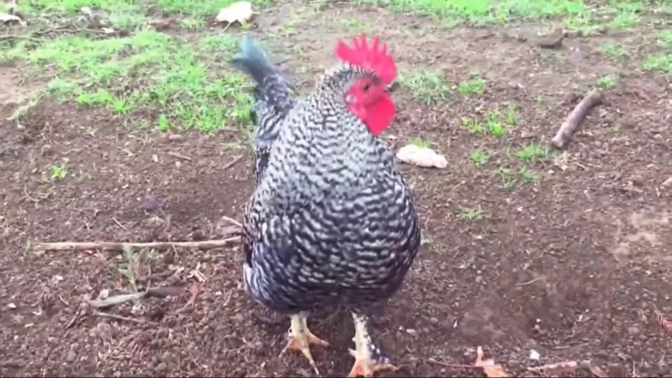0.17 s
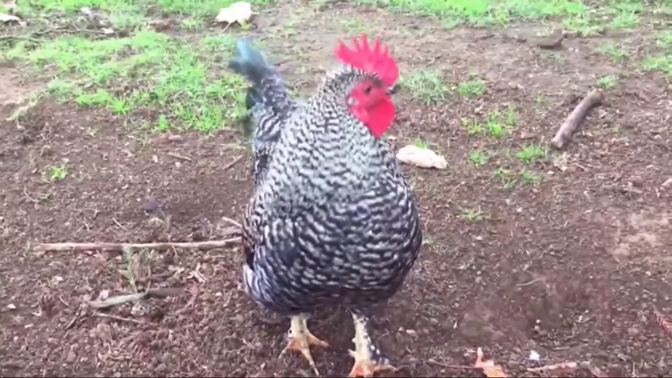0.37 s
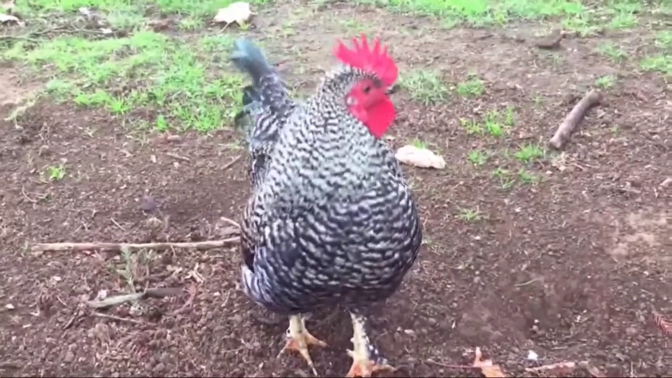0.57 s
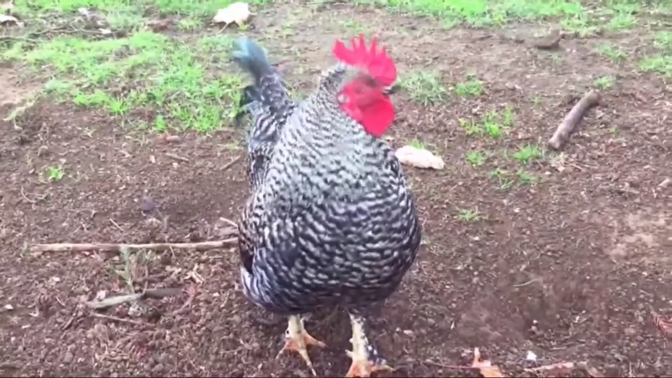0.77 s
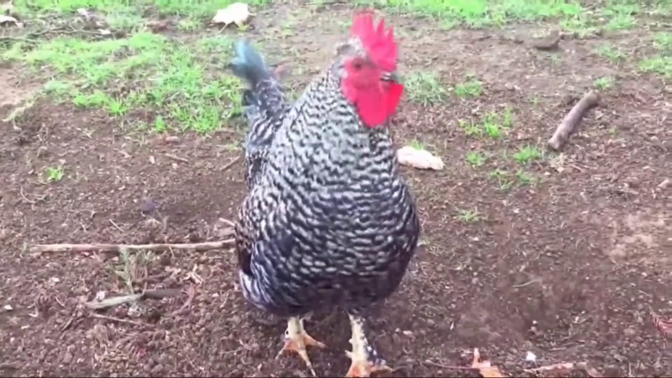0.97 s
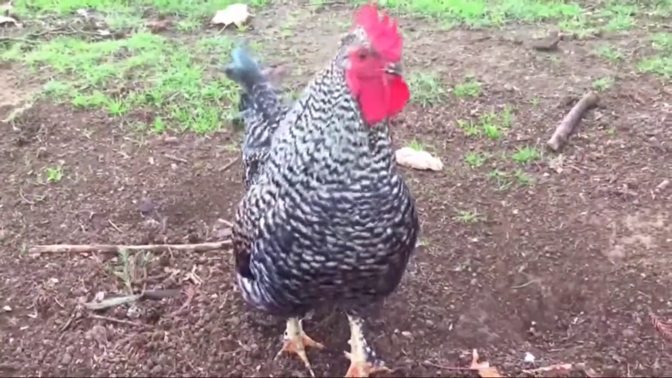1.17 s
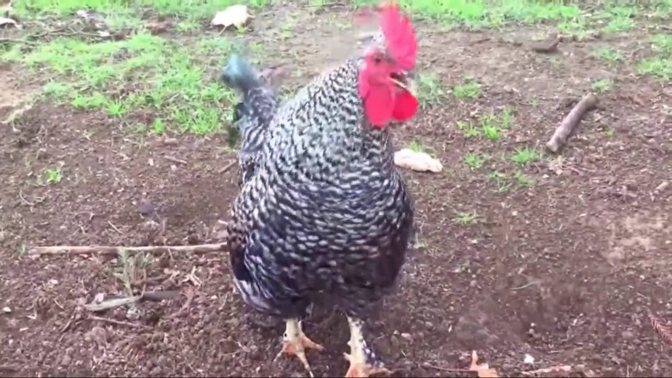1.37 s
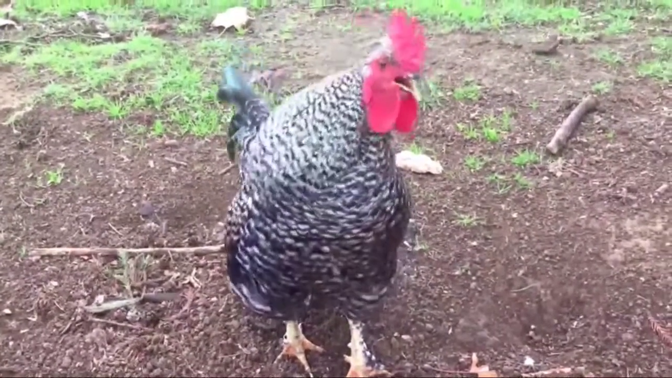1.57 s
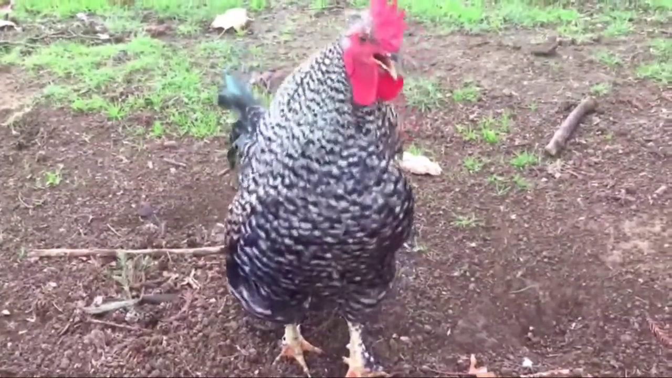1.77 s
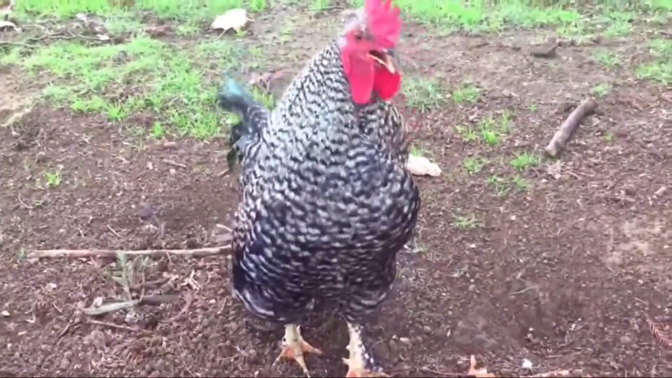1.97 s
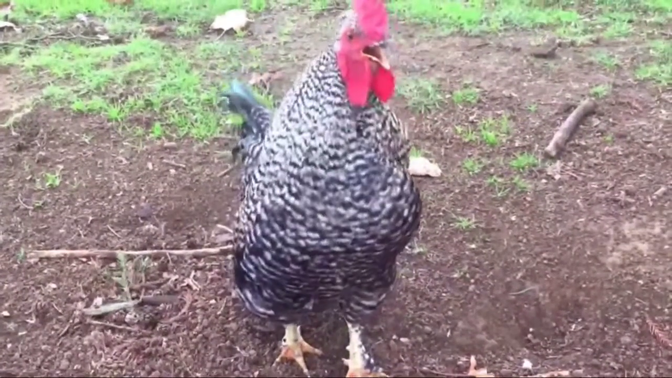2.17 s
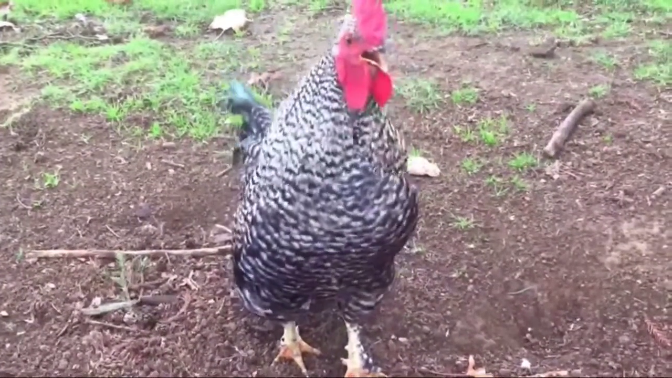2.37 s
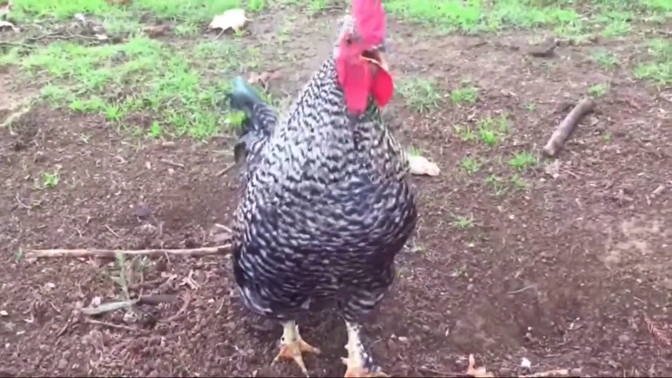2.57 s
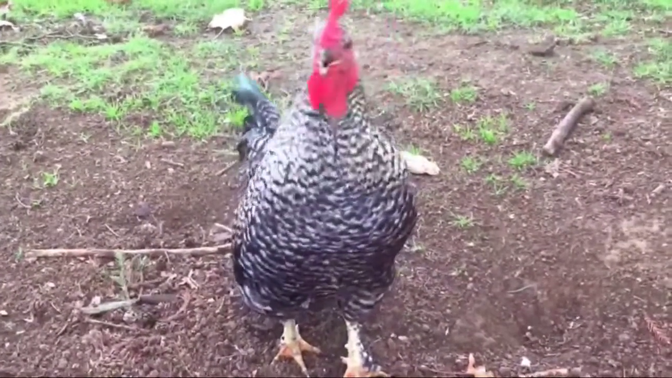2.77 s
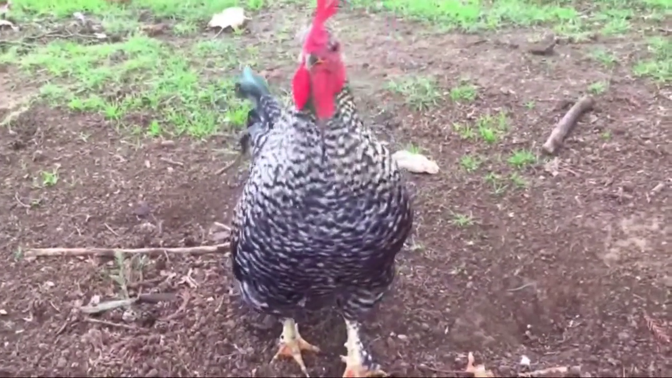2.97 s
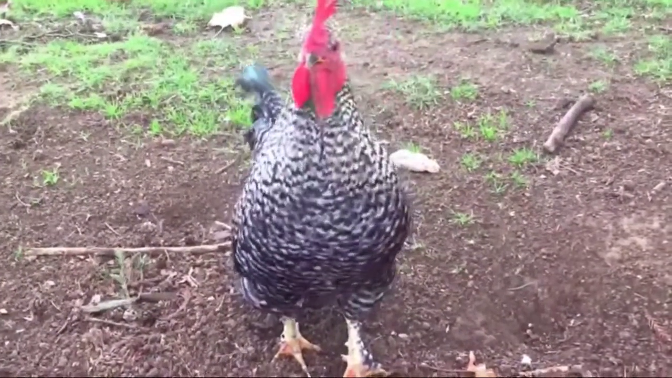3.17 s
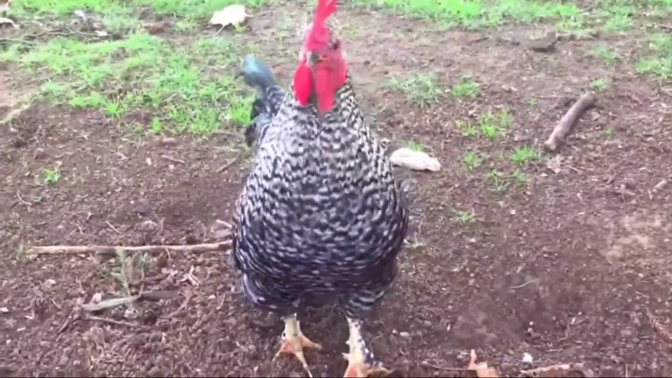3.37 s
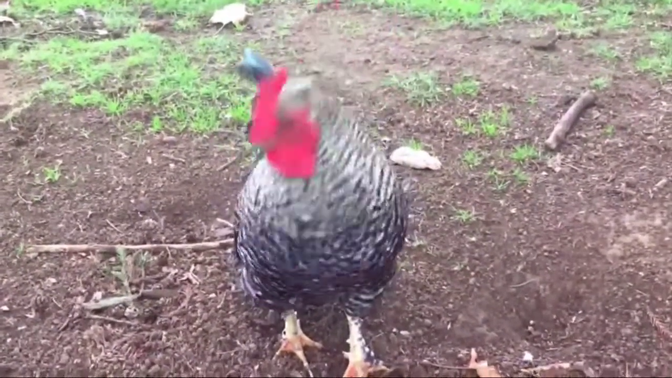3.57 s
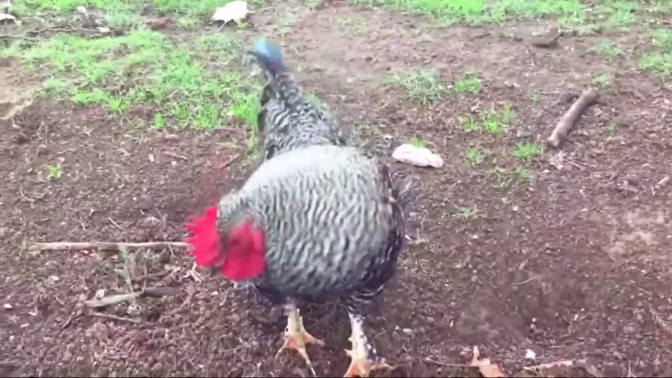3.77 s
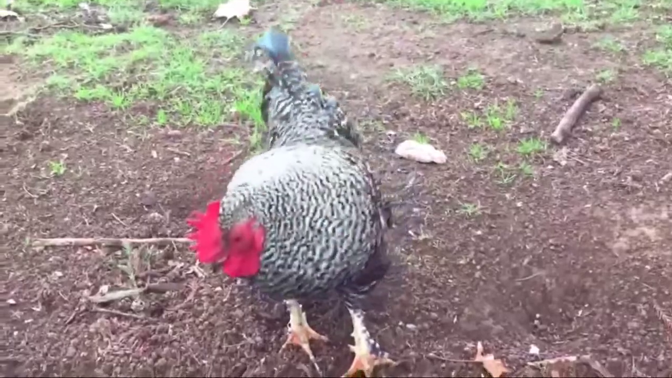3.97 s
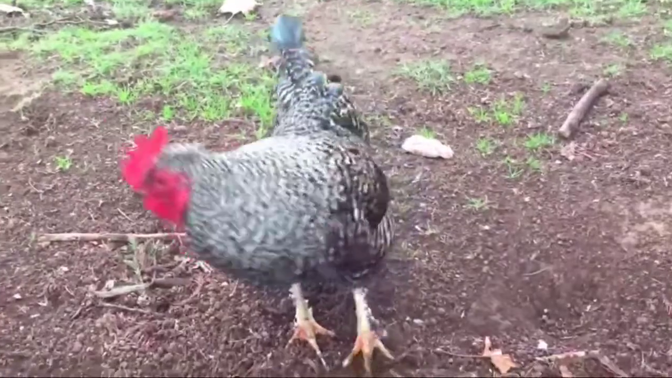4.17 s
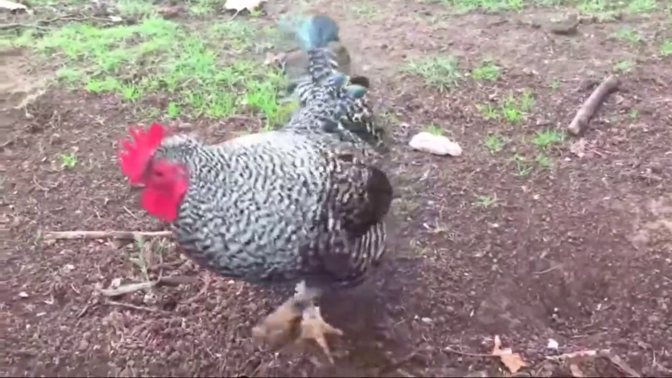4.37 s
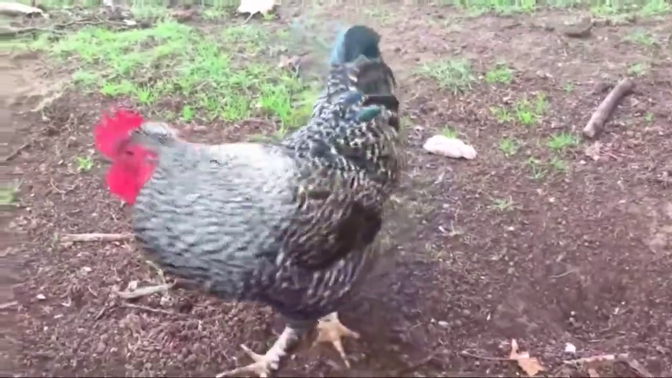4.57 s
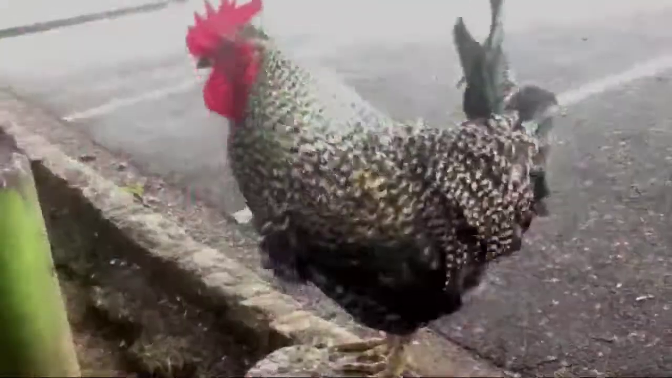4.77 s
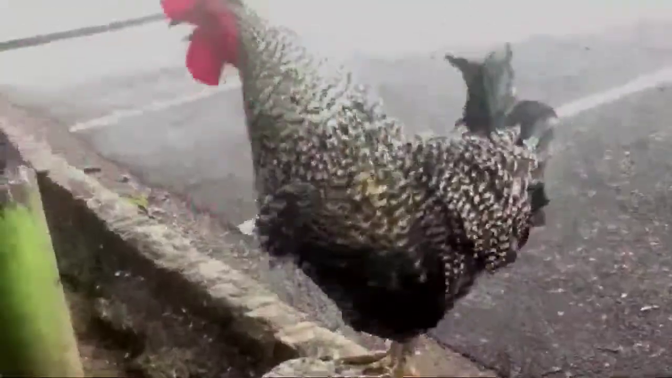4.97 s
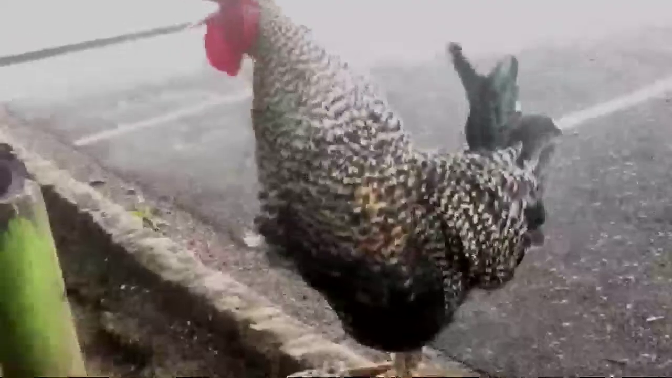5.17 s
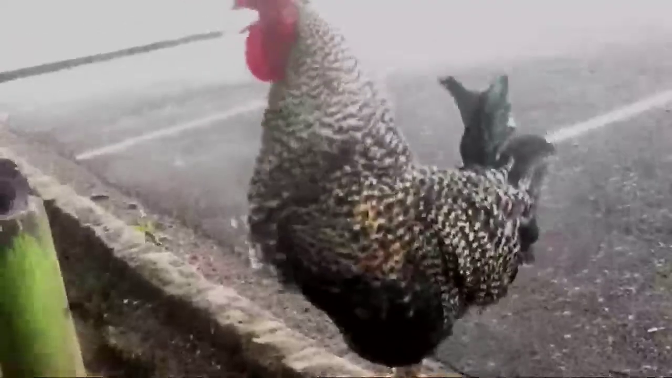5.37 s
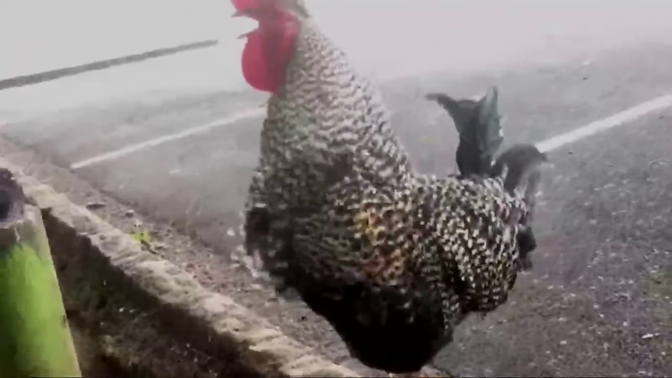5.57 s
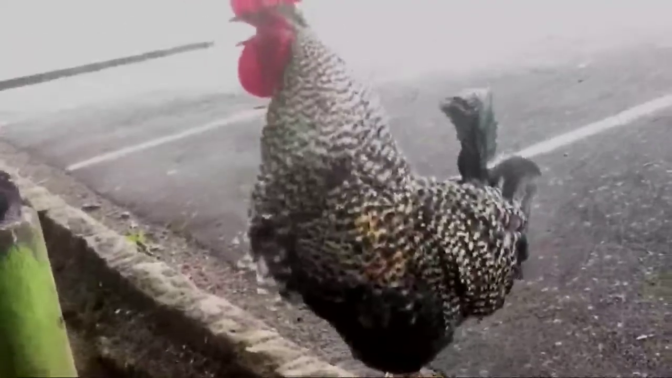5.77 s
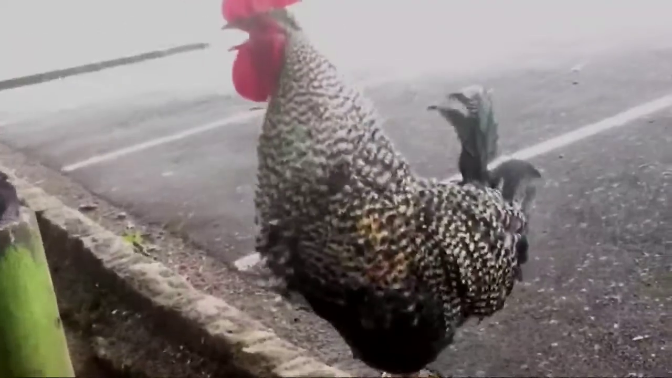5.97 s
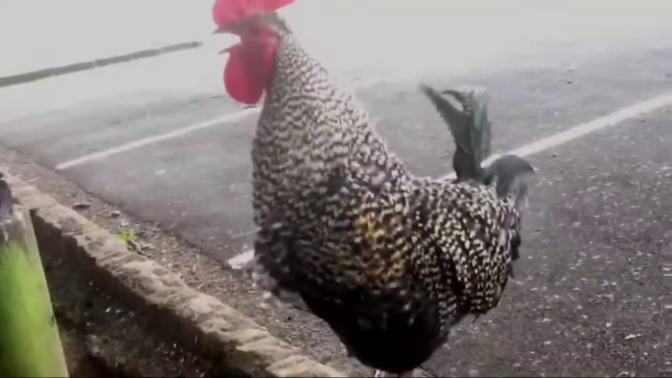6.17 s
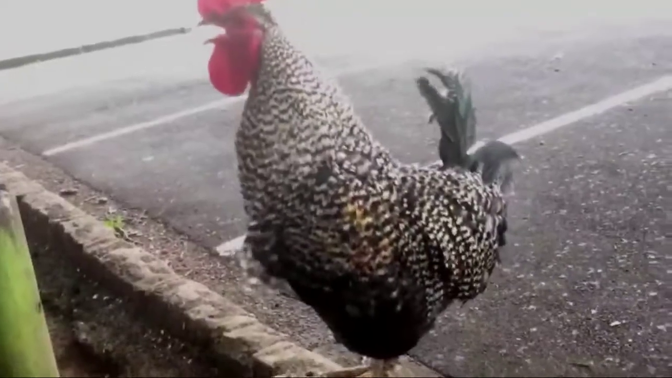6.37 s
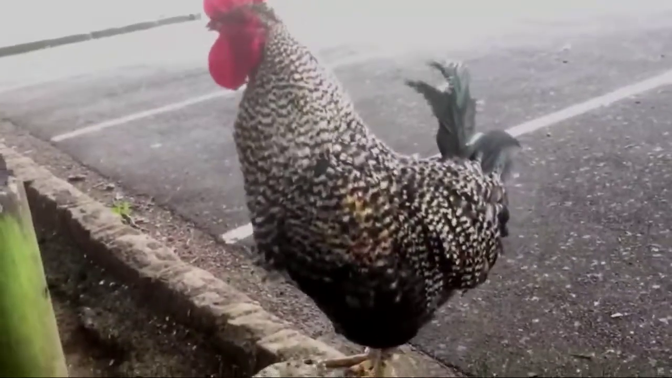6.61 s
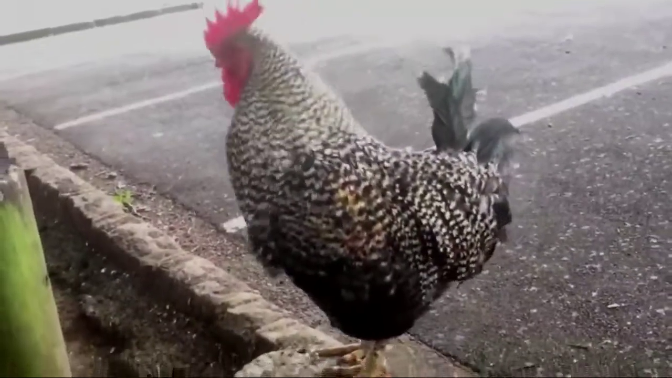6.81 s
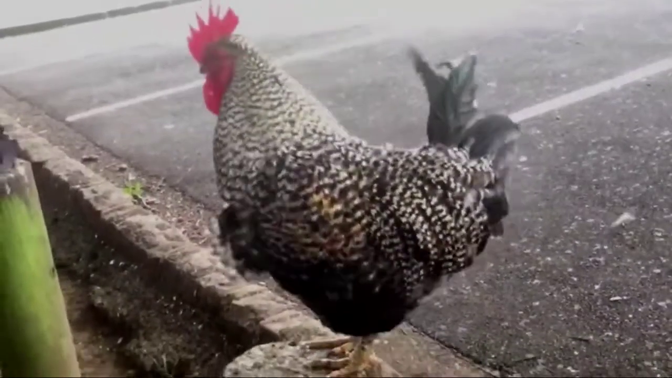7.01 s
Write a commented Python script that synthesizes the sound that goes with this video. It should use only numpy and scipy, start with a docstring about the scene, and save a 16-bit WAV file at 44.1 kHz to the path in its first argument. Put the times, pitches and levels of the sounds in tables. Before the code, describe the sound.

A rooster crows loudly outdoors, a weaker second rooster overlapping its tail; after a quiet pause, one more loud crow rings out over a low rumble.

```python
"""Roosters crow outdoors, louder on the left, over a quiet low rumble with soft rustles.
In the first crow a second, weaker rooster overlaps the leader and finishes after it; one more loud crow
follows. Leader and last crow jump between a clear high and a hoarse low register; all end in a lower rattle.
Each voice is a stack of harmonics shaped by throat resonances, with random modulation for hoarseness.
The rumble and rustles are filtered noise; a small bird's brief chirp is one swept sine."""
import sys
import numpy as np
from scipy import signal
from scipy.io import wavfile
from scipy.ndimage import uniform_filter1d, map_coordinates

SR = 44100
rng = np.random.default_rng(int(sys.argv[2]) if len(sys.argv) > 2 else 0)


def output_pcm(signal):
    """Save a mono or channel-first signal as 16-bit PCM at the path in sys.argv[1].

    Samples are clipped to [-1, 1] before scaling.
    """
    pcm = np.clip(np.atleast_2d(signal).T, -1, 1) * 32767
    wavfile.write(sys.argv[1], SR, np.round(pcm).astype(np.int16))


N = 310489
TIME = np.arange(N) / SR
CUTOFF_HZ = 15500

# Pitch of the leader's broken second syllable. Each row: time in seconds, pitch in Hz.
WARBLE_PITCH = [(1.662, 730), (1.679, 790), (1.693, 685), (1.709, 800), (1.722, 760), (1.735, 788),
                (1.755, 758)]
# The long held note of each crow. Each row: time in seconds, pitch in Hz, level in dB,
# fundamental emphasis in dB, upper-formant emphasis in dB.
LEADER_HELD = [(2.185, 904.5, -22.5, -3, 2.5), (2.25, 927, -21.5, -1, 4), (2.347, 937.2, -19.5, -3, 1),
               (2.429, 932.3, -21.5, -3.5, 2.5), (2.491, 876, -25, 3.5, 2), (2.6, 834.4, -29.5, 11, 4.5),
               (2.635, 770, -37, 10, -4.5), (2.735, 722, -38, 9, -5)]
ANSWER_HELD = [(2.655, 816, -43, -7, -10), (2.735, 872, -32, -10.5, -11.5), (2.901, 879, -31, -10, -11.5),
               (2.991, 874, -31, -11, -11.5), (3.11, 824, -39.5, -12.5, -15), (3.195, 756, -43.5, -9, 5.5),
               (3.23, 720, -45.5, -7, -6)]
LAST_HELD = [(5.71, 908, -21.5, -7, -5), (5.785, 924, -17.5, -11, -8.5), (5.946, 923.5, -18.5, -10, -6.5),
             (6.038, 912.5, -21.5, -9.5, -5.5), (6.098, 886.7, -21.5, -11, -9),
             (6.27, 859, -20.5, -18.5, -9), (6.36, 832, -25.5, -4, 3), (6.42, 817, -26, -1.5, 10.5),
             (6.49, 775.5, -33, 4.5, 0), (6.505, 722, -37, 5, -3)]

ATTACK_S, RELEASE_S, EDGE_DB = .012, .018, 30.5  # a note rises and falls by so many dB in these times
ONSET_ROUGH, SETTLE_S = .13, .018  # a clear note starts rough and settles
FLUTTER_HZ, FLUTTER_DEPTH = 39.2, .0074  # rate, and share of the pitch, of a held note's flutter
CROAK_BRASS_DB, CROAK_RING_DB = -5, 2.5  # hoarse notes are hardly brassy but ring high up


def from_db(db):
    """Logarithmic level: 20 dB is a tenfold amplitude."""
    return 10 ** (np.asarray(db) / 20)


def rms_one(x):
    """Normalization of mean power: scale to unit rms."""
    return x / np.sqrt(np.mean(x ** 2) + 1e-20)


def at_hz(points, hz):
    """Spectral envelope: interpolate linearly on a log-frequency axis."""
    known_hz, values = np.transpose(points)
    return np.interp(np.log(hz), np.log(known_hz), values)


def wander(per_s, size):
    """Slow random modulation: smoothly joined random values, so many a second, at unit rms."""
    steps = np.arange(size) * per_s / SR
    return rms_one(map_coordinates(rng.standard_normal(4096), [steps], order=2, mode="wrap"))


def band(x, low_hz, high_hz):
    """Band-pass filtering with gentle Butterworth slopes."""
    sos = signal.butter(2, [low_hz, min(high_hz, .45 * SR)], "band", fs=SR, output="sos")
    return signal.sosfilt(sos, x)


def outdoor_air(patchy_db):
    """Interaural coherence: restless narrow noise bands are alike in both channels only in the bass."""
    # Background spectrum. Each row: frequency in Hz, relative density in dB per Hz.
    air_spectrum = [(50, -29), (95, -12), (140, -2.5), (190, -7.5), (620, -5.5), (1000, -9), (2500, -19.5),
                    (3400, -21), (5700, -30.5), (7100, -24.5), (8800, -33.5), (15000, -37.5)]
    # Coherence of the channels. Each row: frequency in Hz, left-right likeness from 0 to 1.
    coherence = [(130, 0.98), (640, .46), (1400, .05)]
    out = 0
    edges = np.geomspace(35, CUTOFF_HZ, 29)
    white = rng.standard_normal((2, 2, N))
    for k, (low, high) in enumerate(zip(edges, edges[1:])):
        mid, side = band(white[k % 2], low, high)
        hz = np.sqrt(low * high)
        alike = np.clip(at_hz(coherence, hz), -1, 1)
        # gusts stir the low bands most
        gusts = np.interp(TIME * 11, np.arange(80), rng.standard_normal(80)) / (1 + hz / 2500)
        gain = from_db(at_hz(air_spectrum, hz) + patchy_db * gusts)
        out = out + gain * (np.sqrt(1 + alike) * mid + np.sqrt(1 - alike) * side * [[1], [-1]])
    return rms_one(out)


def rustles():
    """Enveloped band noise: soft uneven swells, quick to rise and slow to fade."""
    # Rustles, scuffs and swells of rumble, and at 0.11 s a faint bird chirp as narrow noise near 3.2 kHz. Each
    # row: peak time in seconds, length in seconds, centre in Hz, width in octaves, level in dB before the
    # random unevenness.
    swells = [(0.348, 0.078, 452, 0.2, -50.5), (0.7, 0.12, 2900, 3.6, -55.5), (.11, 0.11, 3200, 0.27, -58),
              (3.75, 0.74, 630, 0.55, -55), (4.39, .1, 666, 0.22, -51.5), (6.99, 0.12, 632, 0.25, -53.5),
              (3.97, .9, 244, .25, -60)]
    out = np.zeros((2, N))
    for peak_s, length, hz, octaves, level_db in swells:
        skew = 1 + .5 * np.sign(TIME - peak_s)
        swell = np.exp(-(2 * (TIME - peak_s) / length / skew) ** 2)
        swell = swell * from_db(2.1 * wander(22, N))
        # low rustles share a part between the channels
        noise = rng.standard_normal((2, N)) + (hz < 1000) * rng.standard_normal(N)
        half_width = 2 ** (octaves / 2)
        out += from_db(level_db) * swell * rms_one(band(noise, hz / half_width, hz * half_width))
    return out


def rooster(note, blare, ring_hz, ring_db, blare_growth, beak_db, hiss_db):
    """Source and filter: the syrinx gives harmonics, the throat shapes them, effort adds brassy overtones."""
    # Resonance of throat and open beak. Each row: frequency in Hz, relative gain in dB.
    throat = [(320, -60), (620, -15), (900, -8), (1250, -6), (1800, -1), (2250, -11.5), (2550, -10.5),
              (3100, -25), (3700, -25.5), (4600, -52), (9800, -66), (12000, -85)]
    full_effort_db = -16.5
    beak_hz, beak_width_hz = 3172, 330  # a resonance that differs from bird to bird and note to note
    formants_hz, formant_width_hz = (1840, 2550), 130  # resonances that turn the phase of each harmonic
    low_edge_hz, low_slope_db = 3450, 11  # the low register falls off steeply above this

    s, *columns = np.broadcast_arrays(*note)
    on = (TIME > s[0]) & (TIME < s[-1])
    columns = [np.interp(TIME[on], s, c) for c in columns]
    pitch, level_db, chest_db, edge_db, rough, brass_db, gape_db, pipe_db, muffle_db = columns
    size, rough = len(pitch), np.clip(rough, 0, 1)
    # overtones lose their hold while the voice leaps between registers
    leap_speed = uniform_filter1d(np.abs(np.gradient(np.log(pitch))) * SR, size=400)
    hold = 1 / (1 + leap_speed / 14)
    # each leap throws the membranes into a moment of chaos
    rough = np.maximum(rough, np.clip(1.6 * (1 - hold) - .15, 0, .65))
    # they always waver a little, and beat irregularly when hoarse
    pitch = pitch * (1 + .0012 * wander(60, size) + .05 * rough ** 1.5 * wander(260, size))
    cycles = np.cumsum(pitch) / SR
    # only the high register is brassy; the low one excites the windpipe's high resonance instead
    register_db = np.interp(pitch, [680, 850, 970, 1030], [-7, .5, .5, -6])
    effort_db = brass_db + blare_growth * (level_db - full_effort_db) + register_db
    ring_gain = from_db(ring_db + pipe_db + 8.3 * rough + 10 * np.log2(900 / pitch))
    low_cut_db = low_slope_db * np.clip((850 - pitch) / 150, 0, 1)
    # the hoarser the voice, the finer the grain of its rasp
    grain = np.cumsum(pitch * .5 * (1 + rough ** 2)) / SR
    rasp = 1.2 * rough ** 1.5
    voice, power = np.zeros(size), np.zeros(size)
    for k in np.arange(1, 25):
        hz = k * pitch
        if hz.min() > CUTOFF_HZ:
            break
        emphasis_db = np.interp(hz, [1050, 1300], [1, 0]) * chest_db
        emphasis_db += np.interp(hz, [2080, 2330], [0, 1]) * edge_db
        emphasis_db += (beak_db + gape_db) * np.exp(-((hz - beak_hz) / beak_width_hz) ** 2)
        emphasis_db -= muffle_db * np.clip((hz - 2850) / 900, 0, 1)
        emphasis_db -= low_cut_db * np.clip((hz - low_edge_hz) / 250, 0, 1)
        body = from_db(at_hz(throat, hz) + emphasis_db)
        ring = hold * ring_gain / (1 + ((hz - ring_hz) / 430) ** 4)
        # as the head moves, each brassy overtone swells and fades on its own
        fading_db = 3.2 * np.interp(cycles / 35, np.arange(64), rng.standard_normal(64))
        brass = hold * from_db(at_hz(blare, hz) + effort_db + fading_db - muffle_db)
        gain = np.sqrt(body ** 2 + ring ** 2 + brass ** 2) * (hz < CUTOFF_HZ)
        # hoarseness changes each harmonic every cycle or two, spreading it into a noisy skirt
        shake, smear = [rasp * map_coordinates(rng.standard_normal(2048), [grain], order=2)
                        for _ in range(2)]
        lag = 2 * sum(np.arctan((hz - f) / formant_width_hz) for f in formants_hz)
        phase = 2 * np.pi * k * cycles - lag
        voice += gain * ((1 + shake) * np.sin(phase) + smear * np.cos(phase))
        power += gain ** 2 * (.5 + rasp ** 2)
    # air hisses past the membranes, more so when hoarse
    hiss = rms_one(band(rng.standard_normal(size), 4000, 8000))
    hiss = from_db(hiss_db) * (.05 + np.minimum(rough, .5)) * hiss
    # even a held note trembles slightly in strength, a hoarse one much more
    tremble_db = (.8 + 2 * rough) * wander(44.91, size)
    out = np.zeros(N)
    out[on] = from_db(level_db + tremble_db) * (voice / np.sqrt(power) + hiss)
    return out


def note_time(start, length):
    """Exponential onset and decay: times across a note, its age, progress 0-1 and edge level in dB."""
    s = np.linspace(start - ATTACK_S, start + length + RELEASE_S, 400)
    age = np.clip(s - start, 0, length)
    outside = np.maximum((start - s) / ATTACK_S, (s - start - length) / RELEASE_S)
    return s, age, age / length, -EDGE_DB * np.maximum(outside, 0)


def croak(start, length, start_hz, end_hz, level_db, fade_db, chest_db, edge_db, beak_db, rough):
    """Register break: a short hoarse glide dips in the middle and is roughest at both ends."""
    s, _, progress, gate_db = note_time(start, length)
    pitch = start_hz + (end_hz - start_hz) * progress ** 3  # glides late
    pitch = pitch * (1 - .035 * np.sin(np.pi * progress))
    rough = rough + .2 * np.cos(np.pi * progress) ** 4
    level_db = level_db - fade_db * progress + gate_db
    return s, pitch, level_db, chest_db, edge_db, rough, CROAK_BRASS_DB, beak_db, CROAK_RING_DB, 0


def syllable(start, length, start_hz, end_hz, scoop, level_db, fade_db, chest_db, edge_db, rough, brass_db):
    """Frequency glide: scoops up to its pitch; as it fades the main resonance loses its lead."""
    s, age, progress, gate_db = note_time(start, length)
    pitch = (start_hz + (end_hz - start_hz) * progress) * (1 - scoop * np.exp(-age / .017))
    # short syllables droop at the end, by 170 Hz per second of length
    pitch = pitch - 170 * length * progress ** 8 * (length < .13)
    pitch = pitch * (1 + .5 * FLUTTER_DEPTH * np.sin(2 * np.pi * FLUTTER_HZ * age))
    faded_db = fade_db * progress ** 2
    soft_db = 1.9 * faded_db  # gained by fundamental and upper formant
    rough = rough + ONSET_ROUGH * np.exp(-age / SETTLE_S)
    level_db = level_db - faded_db + gate_db
    return s, pitch, level_db, chest_db + soft_db, edge_db + soft_db, rough, brass_db, 0, 0, 0


def warble(curve, level_db, chest_db, edge_db, beak_db, rough):
    """Unstable oscillation: a hoarse pitch lurches up and down and fails to reach the high register."""
    knots, pitch = np.transpose(curve)
    s, _, _, gate_db = note_time(knots[0], knots[-1] - knots[0])
    pitch = np.interp(s, knots, pitch)
    return s, pitch, level_db + gate_db, chest_db, edge_db, rough, CROAK_BRASS_DB, beak_db, CROAK_RING_DB, 0


def held_note(curve, dulls_s, muffling_db, rough, brass_db):
    """Damped modulation: flutters at first; as the air runs out brass gives way to the high ring."""
    knots, *columns = np.transpose(curve)
    s, age, _, gate_db = note_time(knots[0], knots[-1] - knots[0])
    pitch, level_db, chest_db, edge_db = [np.interp(s, knots, c) for c in columns]
    flutter = np.exp(-age / .54) * np.sin(2 * np.pi * FLUTTER_HZ * age)
    pitch = pitch * (1 + FLUTTER_DEPTH * flutter)
    level_db = level_db + 1.2 * flutter + gate_db  # the strength flutters with the pitch
    rough = rough + ONSET_ROUGH * np.exp(-age / SETTLE_S)
    muffle_db = muffling_db * .5 * (1 + np.tanh((s - dulls_s) / .04))
    ring_db = .63 * muffle_db
    return s, pitch, level_db, chest_db, edge_db, rough, brass_db, 0, ring_db, muffle_db


def rattle(start, length, start_hz, end_hz, level_db, chest_db, edge_db, beak_db, ring_db, rasp_s, fade_db):
    """Aperiodic onset: breaks in as a rasp, then swells and dies as low falling pulses."""
    s, _, progress, gate_db = note_time(start, length)
    pitch = start_hz + (end_hz - start_hz) * progress ** 1.3
    swell_db = 5 * (np.sin(np.pi * progress) - 1) - fade_db * progress ** 3
    settled_rough = .27
    rough = settled_rough + (1 - settled_rough) / (1 + ((s - s[0]) / rasp_s) ** 10)
    level_db = level_db + swell_db + gate_db
    return s, pitch, level_db, chest_db, edge_db, rough, CROAK_BRASS_DB, beak_db, ring_db, 0


def crow(bird, blare, syllable_blare, **throat):
    """Superposition: the notes of one crow add up, all sung through the same throat."""
    # In all five tables levels are in dB before the port gains, and a negative fade is a growth.
    # Clear high syllables. Each row: bird, start in seconds, length in seconds, start pitch in Hz,
    # end pitch in Hz, upward scoop 0-1, level in dB, fade in dB, fundamental emphasis in dB,
    # upper-formant emphasis in dB, roughness 0-1, brassiness in dB.
    syllables = [("leader", 1.48, .086, 874, 876, .04, -26.5, -5, -1, -1, .04, -2),
                 ("leader", 1.647, .011, 915, 955, 0, -19.5, 0, -16, -3, .03, -10),
                 ("leader", 1.703, .027, 880, 872, 0, -25, -1, -3, -6, .12, -2),
                 ("leader", 1.947, .137, 1082, 918, .13, -15.5, 7, -8, -5, .035, -1),
                 ("answer", 1.805, .055, 942, 915, .02, -29, 1, 4, 12, .09, 5),
                 ("answer", 1.87, .09, 870, 840, 0, -32, 0, 4, 12, .11, -18),
                 ("answer", 1.96, .51, 940, 928, .14, -33, 6, 5.1, 7, .02, 0),
                 ("last", 5.217, .092, 890, 880, 0.045, -16, 0, -20, -14, .035, -3),
                 ("last", 5.492, 0.018, 925, 945, 0.018, -18, -1, -10, -4, 0.06, -1),
                 ("last", 5.516, .118, 1030, 925, 0, -17.5, 0, -7.5, -8, .05, 0)]
    # Hoarse low croaks. Each row: bird, start in seconds, length in seconds, start pitch in Hz,
    # end pitch in Hz, level in dB, fade in dB, fundamental emphasis in dB, upper-formant emphasis
    # in dB, beak emphasis in dB, roughness 0-1.
    croaks = [("leader", 1.461, .016, 730, 800, -40.5, -6, 0, 6.6, 0, .9),
              ("leader", 1.569, .027, 840, 770, -31, 4, -3, 2, 0, .1),
              ("leader", 1.6, .042, 625, 615, -38, 0, -6.5, 1, -4, 0.27),
              ("leader", 1.763, .07, 662, 655, -26, 10, -6, 0, -5, 0.24),
              ("leader", 1.928, .016, 660, 720, -37, -5, 0, 4.6, 0, .9),
              ("leader", 2.092, .083, 660, 790, -29, 0, -4, 11, -8.5, .04),
              ("last", 5.193, .019, 630, 740, -26, 2, -14, 6, -3, .3),
              ("last", 5.314, .012, 835, 775, -22, 5, -16, -2, -6, .05),
              ("last", 5.329, .03, 695, 690, -32, 9, -10, -15, 0, .15),
              ("last", 5.475, 0.012, 665, 670, -31, -3, -22, 3, 0, 0.45),
              ("last", 5.64, .018, 900, 740, -24.5, 4, -8.5, 0.98, 0, .35),
              ("last", 5.662, .043, 685, 830, -29, -3.5, -12.5, 1, 0, .12)]
    # Broken syllable. Each row: bird, pitch curve, level in dB, fundamental emphasis in dB,
    # upper-formant emphasis in dB, beak emphasis in dB, roughness 0-1.
    warbles = [("leader", WARBLE_PITCH, -26, 6, 1, 9, .28)]
    # Held notes. Each row: bird, curve, time of turning dull in seconds, muffling in dB,
    # roughness 0-1, brassiness in dB.
    held_notes = [("leader", LEADER_HELD, 2.477, 8, .025, 0), ("answer", ANSWER_HELD, 3.16, 13, .015, 0),
                  ("last", LAST_HELD, 6.32, 19, .018, 5)]
    # Closing rattles. Each row: bird, start in seconds, length in seconds, start pitch in Hz, end pitch
    # in Hz, level in dB, fundamental emphasis in dB, upper-formant emphasis in dB, beak emphasis in dB,
    # high ring in dB, length of the opening rasp in seconds, fade in dB.
    rattles = [("leader", 2.706, .1, 715, 640, -36.5, -10, 2, 7, -8, .11, -4),
               ("leader", 2.803, .125, 622, 546, -33.5, -1, 6, 5, 2, .012, -1.6),
               ("leader", 2.934, .075, 455, 402, -33, 14, -15, 0, 0, .002, 0),
               ("answer", 3.24, 0.031, 595, 545, -40, -6, -12, -4, -8, .03, 2),
               ("last", 6.514, .15, 338, 275, -27.5, -6, 3.5, -3, 2, .03, 20)]
    kinds = ((syllable, syllables), (croak, croaks), (warble, warbles),
             (held_note, held_notes), (rattle, rattles))
    out = np.zeros(N)
    for shape, table in kinds:
        overtones = syllable_blare if shape is syllable else blare
        for singer, *row in table:
            if singer == bird:
                out += rooster(shape(*row), overtones, **throat)
    return out


def scatter(x, t60):
    """Reverberation: two independent, dull, decaying sets of reflections from ground, plants and walls."""
    age = TIME[:SR]
    paths = band(rng.standard_normal((2, SR)), 700, 6000) * from_db(-60 * age / t60) * (age > .006)
    paths /= np.sqrt(np.sum(paths ** 2, axis=1, keepdims=True))
    return signal.fftconvolve(x[None], paths, axes=1)[:, :N]


def yard(x, wet_db, t60, echo_db):
    """Arrival time and level differences: a crow with its echo reaches the left port first and louder."""
    common, diffuse = from_db(wet_db) * scatter(x, t60)
    # a far wall sends back a dull echo
    echo = from_db(echo_db) * band(np.interp(TIME - .135, TIME, x), 900, 2600)
    left = x + common + echo
    right = np.interp(TIME - .00041, TIME, left) + 1.5 * diffuse
    # on the shaded side the treble also arrives by a detour that shifts as the head moves
    detour_s = .0009 + .0001 * wander(4, N)
    right = right + from_db(-6) * band(np.interp(TIME - detour_s, TIME, x), 4000, 12000)
    return np.array([from_db(5.5) * left, from_db(-4.5) * right])


def small_bird():
    """Frequency modulation: one unsteady whistle sweeps up and falls back."""
    # A small bird far off. Each row: time in seconds, pitch in Hz, level in dB before the mix.
    chirp = [(4.615, 2344, -79), (4.656, 3520, -54), (4.673, 3250, -73), (4.696, 3110, -51.5),
             (4.715, 3060, -79)]
    s, hz, level_db = np.transpose(chirp)
    pitch = np.interp(TIME, s, hz) * (1 + .0268 * wander(400, N))
    whistle = rms_one(np.sin(2 * np.pi * np.cumsum(pitch) / SR))
    return np.interp(TIME, s, from_db(level_db), left=0, right=0) * whistle


def scene():
    """Linear superposition: two overlapping crows, then a single one, over the background."""
    # Brassy overtones of a crow at full effort. Each row: frequency in Hz, relative gain in dB.
    first_blare = [(2900, -45.5), (3700, -29), (4700, -37.5), (7000, -42.5), (8200, -54), (9400, -48),
                   (11000, -83.5)]
    last_blare = [(2900, -45), (3700, -22), (4400, -44), (5300, -42.5), (5950, -46), (6130, -31),
                  (6450, -48), (6950, -49), (7370, -61.5), (7800, -45), (8300, -48), (8750, -36.5),
                  (9200, -39), (9700, -57.5), (10800, -72)]
    # The last crow's clear syllables blare differently. Each row: frequency in Hz, relative gain in dB.
    last_opening_blare = [(2900, -45), (3850, -23), (4400, -44), (5150, -32.5), (5800, -44), (8700, -47),
                          (10500, -72)]
    first = crow("leader", first_blare, first_blare,
                 ring_hz=6780, ring_db=-43.0, blare_growth=.6, beak_db=4.5, hiss_db=-29)
    answer = crow("answer", first_blare, first_blare,
                  ring_hz=6616, ring_db=-42.5, blare_growth=1.1, beak_db=3.5, hiss_db=-33)
    last = crow("last", last_blare, last_opening_blare,
                ring_hz=6550, ring_db=-42, blare_growth=.83, beak_db=-1, hiss_db=-28)
    crows = yard(first + answer, wet_db=-19.5, t60=.66, echo_db=-44.5)
    crows = crows + yard(last, wet_db=-21, t60=.63, echo_db=-35.5)
    chirp = small_bird()
    distant_chirp = .5 * (chirp + scatter(chirp, t60=.2))
    air = from_db(-54.5) * outdoor_air(patchy_db=4.5)
    return crows + air + rustles() + distant_chirp


def record(dry):
    """Band limiting: an elliptic low-pass cuts the top steeply."""
    return signal.sosfilt(signal.ellip(10, .1, 80, CUTOFF_HZ, fs=SR, output="sos"), dry)


dry = scene()
out = record(dry)
output_pcm(out)
```